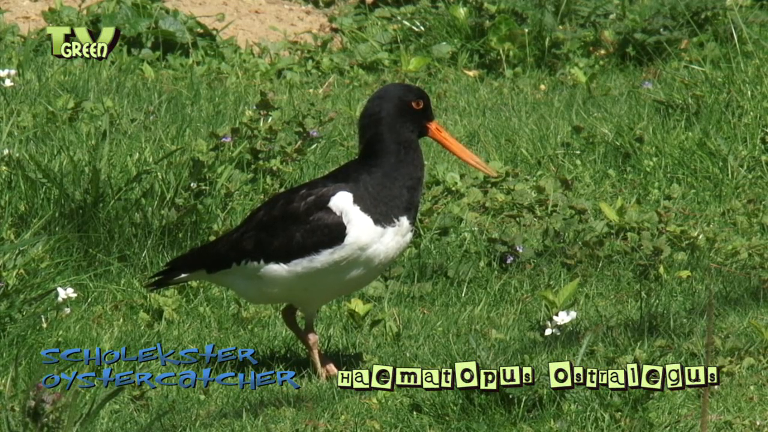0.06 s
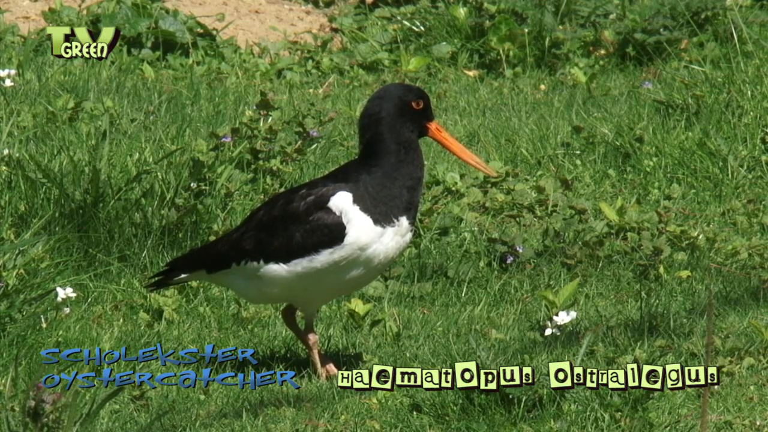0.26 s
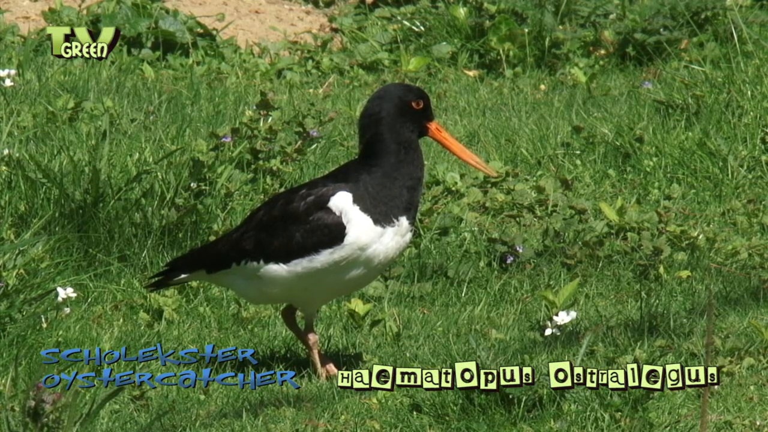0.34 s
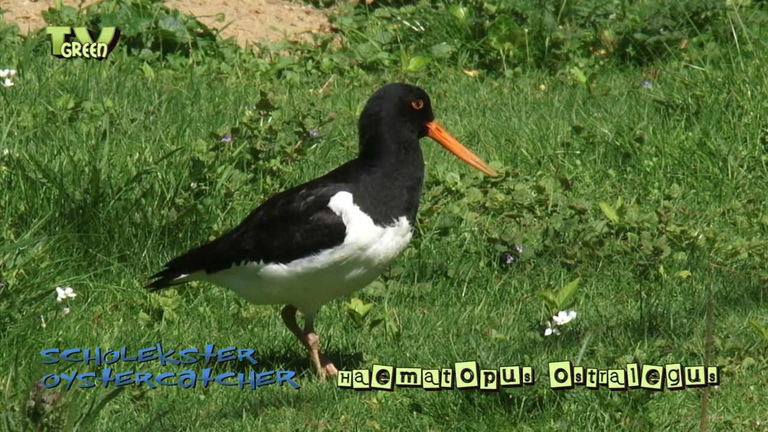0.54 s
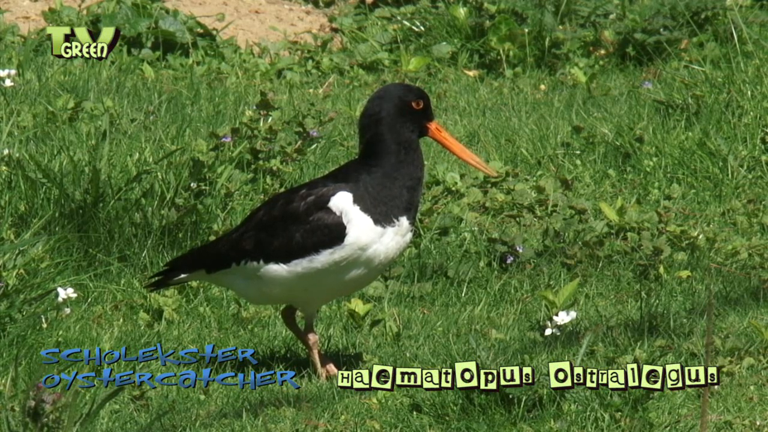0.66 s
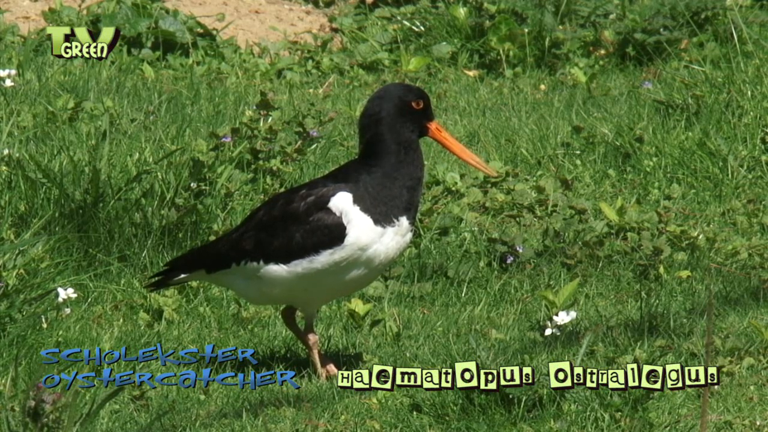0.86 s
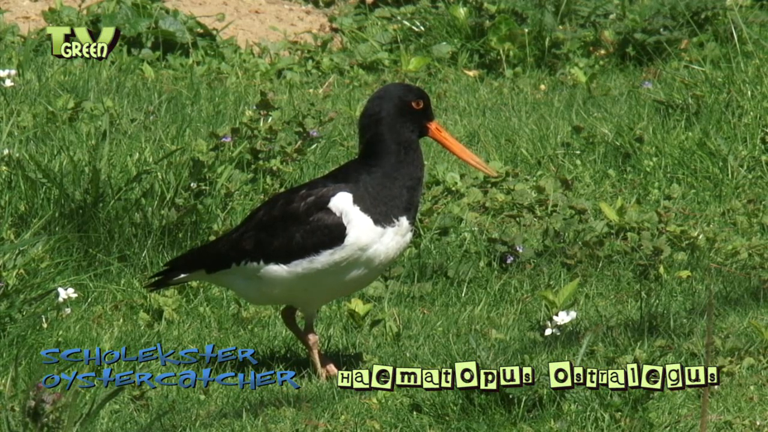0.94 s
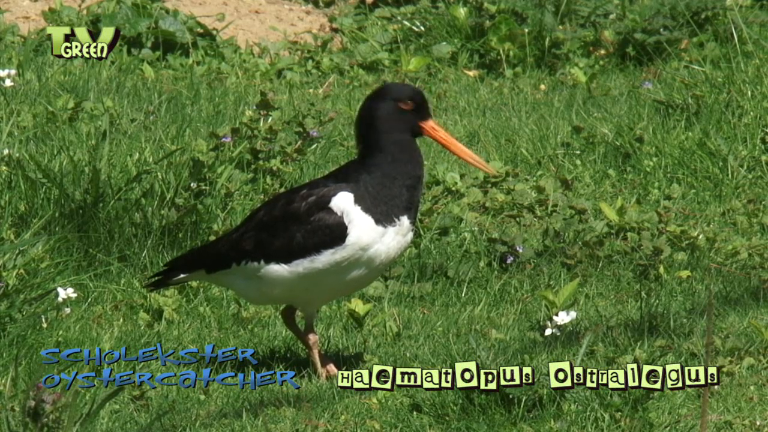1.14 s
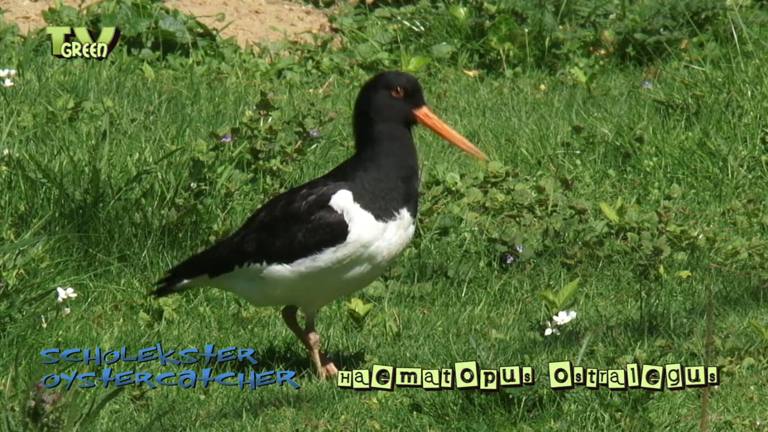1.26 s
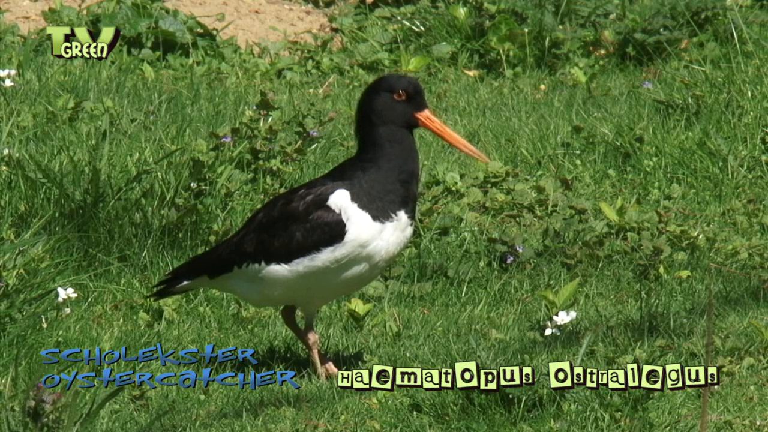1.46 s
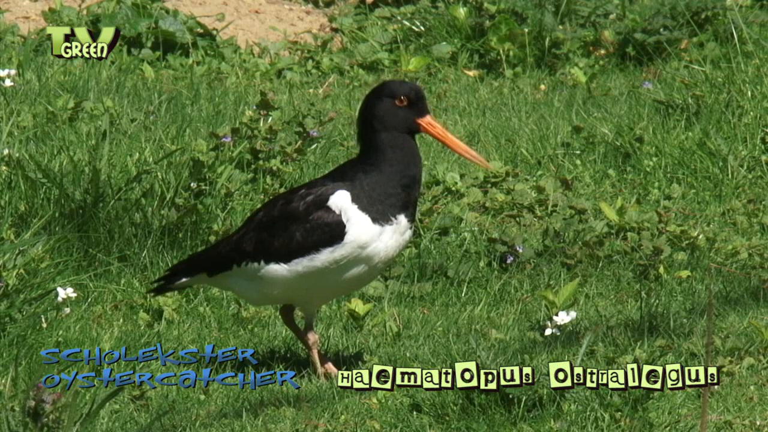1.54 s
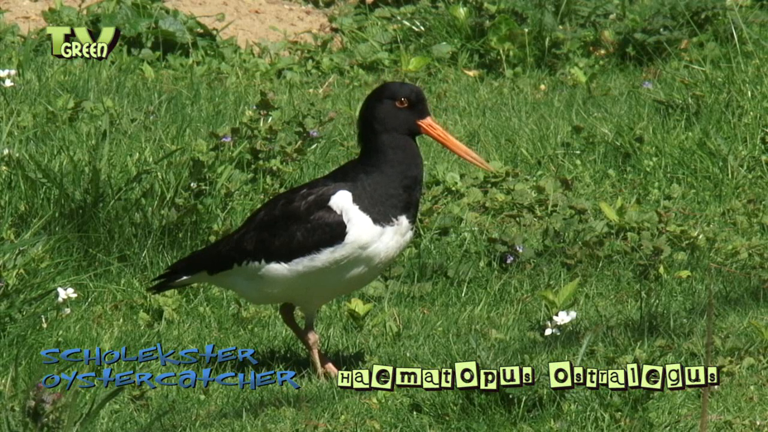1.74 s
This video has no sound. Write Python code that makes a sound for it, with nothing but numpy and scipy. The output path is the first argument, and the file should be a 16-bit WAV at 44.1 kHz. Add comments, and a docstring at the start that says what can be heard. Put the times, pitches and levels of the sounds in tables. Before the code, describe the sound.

An oystercatcher pipes close by, slightly left: a loud, clear, high note at 0.3 seconds and a somewhat softer one at 0.6, each leaping up, holding and dropping after a soft short note. Farther off, birds yelp with hoarse breaks until 1.6 seconds, and a thin whistle repeats four times among faint squeaks. A tiny crackle comes at 0.8 seconds. A quiet, low outdoor wash continues underneath.

```python
"""An oystercatcher on a lawn pipes two loud, clear notes up close, each after a soft short one.
Its voice is a near-pure tone that leaps up, holds and drops, brightening with effort.
Farther off, other birds yelp in arched, overtone-rich calls with hoarse breaks, one repeats a thin
two-part whistle, and faint squeaks slide by, all with a light echo over a steady low outdoor wash.
There is also a brief, faint crackle of tiny clicks, like clipping."""
import sys
import numpy as np
from scipy import signal
from scipy.fft import rfft, irfft
from scipy.io import wavfile
from scipy.ndimage import uniform_filter1d

SR = 44100
rng = np.random.default_rng(int(sys.argv[2]) if len(sys.argv) > 2 else 0)


def unload_audio(sound):
    """Save the sound as a 16-bit wav file, at the path given as the first command line argument."""
    columns = np.transpose(np.atleast_2d(sound))
    # keep every value between -1 and 1, then stretch to whole-number steps
    steps = np.round(np.clip(columns, -1, 1) * 32767)
    wavfile.write(sys.argv[1], SR, steps.astype(np.int16))


N = 79380
T = np.arange(N) / SR
BIN_HZ = np.fft.rfftfreq(N, 1 / SR)


def amp(db):
    """Decibels to gain."""
    return 10 ** (np.asarray(db) / 20)


def unit(x):
    """Scales to rms 1."""
    return x / np.sqrt(np.mean(x ** 2) + 1e-20)


def eq_db(curve, hz):
    """Level of an EQ curve at hz, on a log-frequency axis."""
    points_hz, db = np.transpose(curve)
    return np.interp(np.log(hz + 1), np.log(points_hz + 1), db)


def noise(curve):
    """Noise coloured by an EQ curve, at rms 1."""
    return unit(irfft(rfft(rng.standard_normal(N)) * amp(eq_db(curve, BIN_HZ)), N))


def wobble(hz):
    """Random modulation that rolls off above hz."""
    return unit(irfft(rfft(rng.standard_normal(N)) / (1 + (BIN_HZ / hz) ** 2), N))


def gate(start, end, ramp_s):
    """Opens and closes with short ramps."""
    return np.clip(np.minimum(T - start, end - T) / ramp_s, 0, 1)


def glide(rows, smooth_samples):
    """Smooth pitch and level curves through a call's breakpoints."""
    times, *columns = np.transpose(rows)
    return [uniform_filter1d(np.interp(T, times, column), smooth_samples) for column in columns]


def phase_of(hz, jitter):
    """Running phase of an unsteady voice; jitter is a fraction of the pitch."""
    return 2 * np.pi * np.cumsum(hz * (1 + jitter * wobble(180))) / SR


def pan(x, left_db, left_lag_s=0):
    """Stereo position from the left channel's level and delay against the right."""
    spectrum = rfft(x)
    delay = np.exp(-2j * np.pi * BIN_HZ * left_lag_s)
    return irfft(np.array([spectrum * delay * amp(left_db / 2), spectrum * amp(-left_db / 2)]), N)


# Colour of the outdoor bed. Each row: frequency in Hz, relative level in dB.
BACKGROUND_EQ = [(21, -34), (35, -6), (88, -3.5), (179, -10.5), (243, -14.5), (384, -6.5), (657, -9.5),
                 (727, -3), (847, -5), (938, -5.5), (1090, -7.5), (1210, -6), (1410, -7.5), (1730, -8.5),
                 (2070, -5), (2670, -2.5), (3110, -6.5), (3440, -3), (3720, -6.5), (7210, -37.5),
                 (15500, -35.5)]


def background(level_db=-54, side_db=-20.5):
    """Steady outdoor wash, nearly the same on both sides."""
    middle = pan(noise(BACKGROUND_EQ), left_db=-1.1)
    sides = amp(side_db) * noise(BACKGROUND_EQ) * np.array([[1], [-1]])
    return amp(level_db) * (middle + sides)


# Distant yelps, one list of breakpoints per call. Each row: time in seconds, pitch in Hz,
# second harmonic level in dB, third harmonic level in dB.
YELP_CALLS = [
    [(0.0, 1358, -26.5, -64), (0.008, 1445, -32.5, -52), (0.018, 1430, -40, -51), (0.031, 1396, -29, -46),
     (0.044, 1170, -60.5, -69)],
    [(0.206, 1290.0, -49, -66.5), (0.225, 1325.0, -43.5, -43.5), (0.25, 1275.0, -29, -43),
     (0.28, 1195.0, -40.5, -57.5), (0.32, 1153, -35, -56.5), (0.38, 1150, -35.5, -53.5),
     (0.44, 1127, -36, -61.0), (0.468, 1110, -38, -48.5), (0.487, 981, -45.5, -44.0),
     (0.505, 955.0, -38.5, -38.5), (0.516, 930.0, -65.5, -51.5)],
    [(0.563, 1040.0, -48.5, -51), (0.577, 1193, -34.0, -40), (0.592, 1275, -29.5, -45.5),
     (0.607, 1240, -33.5, -48.5), (0.617, 1078, -51, -39), (0.626, 974, -43, -64)],
    [(0.66, 1128, -47.5, -43.5), (0.68, 1274, -31, -40.5), (0.695, 1336, -25, -42.5),
     (0.72, 1260.0, -36.5, -58.5), (0.745, 1202, -34, -59), (0.772, 1252, -37.5, -54.5),
     (0.786, 1346, -34.5, -46.5), (0.796, 1412, -23.5, -54.5), (0.808, 1429, -23.0, -44.5),
     (0.821, 1419, -25.5, -47.5), (0.83, 1302, -34, -40.5), (0.838, 1200.0, -51, -77)],
    [(1.001, 1305.0, -49, -64), (1.008, 1315, -33, -42.5), (1.023, 1333.0, -28, -45.5),
     (1.038, 1316, -33.5, -41.0), (1.047, 1284, -40, -58.5), (1.066, 1240.0, -29.5, -55.5),
     (1.1, 1155, -41.5, -69), (1.15, 1130.0, -52.5, -58.0), (1.195, 1105, -37.5, -69),
     (1.228, 1072, -48, -41.5), (1.252, 1064, -47.5, -45), (1.278, 999, -41, -41.5),
     (1.3, 876, -66.5, -51.5)],
    [(1.355, 1034, -47, -58.5), (1.364, 1175, -35.5, -42), (1.373, 1245.0, -31.5, -48.5),
     (1.383, 1253, -34.5, -48), (1.394, 1254, -33.5, -47), (1.405, 1084, -45.0, -43.5),
     (1.415, 1010, -71, -72.0)],
    [(1.448, 1080.0, -63, -59.5), (1.455, 1180, -37.5, -44), (1.465, 1271, -33.5, -36.5),
     (1.476, 1344, -44, -44), (1.487, 1321, -29.5, -32), (1.506, 1350, -27.0, -40), (1.519, 1373, -25, -44),
     (1.538, 1384, -23, -40.5), (1.55, 1340, -32.5, -36.5), (1.558, 1235, -42.0, -46),
     (1.566, 1120, -60.5, -74.5)],
]
# Throat colour for harmonics 1 and 4 to 6. Each row: frequency in Hz, relative level in dB.
THROAT_EQ = [(950,-20),(1200,-15.5),(1350,-24),(1430,-15),(2500,-6.5),(3800,-7),(4400,-12.5),(4750,-22),(5300,-21.5),(5700,-27.5),(6300,-44),(8000,-52)]


def yelp(rows, waver_db=4, rasp_db=-24):
    """An arched call: weak fundamental, strong second and third harmonics, wavering upper ones."""
    hz, second_db, third_db = glide(rows, smooth_samples=130)
    phase = phase_of(hz, jitter=0.0042)
    levels = [second_db + eq_db(THROAT_EQ, hz), second_db, third_db + waver_db / 2 * wobble(45)]
    body_db = (second_db + third_db) / 2
    levels += [body_db + eq_db(THROAT_EQ, k * hz) + waver_db * wobble(30) for k in range(4, 7)]
    tone = sum(amp(db) * np.sin(k * phase) for k, db in enumerate(levels, 1))
    rasp = 1 + amp(rasp_db) * wobble(420)
    return np.sqrt(2) * tone * rasp * gate(rows[0][0], rows[-1][0], ramp_s=0.001)


# Faint far calls and quick squeaks. Each row: start in seconds, length in seconds,
# opening pitch in Hz, closing pitch in Hz, level in dB.
FAINT_CALLS = [(0.038,0.066,3330,3580,-64.5),(.11,0.14,4000,4830,-69),(0.137,0.031,3080,2810,-54),(0.274,0.015,4700,3560,-53.5),(.55,0.032,2100,2195,-42.5),(0.931,0.056,2420,2340,-57.5),(0.948,.05,3155,3400,-61),(1.014,0.029,2050,3870,-51.5),(1.309,0.034,1970,2022,-51.5),(1.346,0.023,2900,2990,-46.5),(1.467,0.013,2500,3850,-47),(1.722,0.075,2316,2180,-62.5)]


def faint_call(start, length, from_hz, to_hz, db):
    """A far bird's thin slide of pitch."""
    hz = np.interp(T, [start, start + length], [from_hz, to_hz])
    envelope = amp(db) * gate(start, start + length, ramp_s=0.004)
    return np.sqrt(2) * envelope * np.sin(phase_of(hz, jitter=0.011))


# Two-part whistles. Each row: start of the long note in seconds, its length in seconds, its level in dB,
# lead-in level in dB, time from that start to the lift in seconds, lift height in Hz.
WHISTLE_CALLS = [(0.183,.2,-43,-47,0.13,71.6),(0.649,0.2,-39,-41,0.13,67),(1.083,0.203,-37.5,-42,.168,96.3),(1.519,0.19,-44,-44,.11,40)]


def whistle(start, length, db, lead_db, lift_at, lift_hz):
    """A short low lead-in breaks upward, then settles on a long note that lifts once."""
    lead_hz, settled_hz, overshoot_hz = 2165, 2229, 240
    lead_s, attack_s, settle_s, lift_s, release_s = 0.032, 0.001, 0.01587, 0.032, 0.024
    age = np.maximum(T - start, 0)
    overshoot = overshoot_hz * np.exp(-age / settle_s)
    lift = lift_hz * np.exp(-((age - lift_at) / lift_s) ** 2)
    hz = np.where(T < start, lead_hz, settled_hz + overshoot + lift)
    held = np.clip(np.minimum(age / attack_s, (length - age) / release_s), 0, 1)
    envelope = amp(db) * held + amp(lead_db) * gate(start - lead_s, start, ramp_s=0.0017)
    return np.sqrt(2) * envelope * np.sin(phase_of(hz, jitter=0.0038))


# The oystercatcher's notes (soft, loud, soft, loud), one list of breakpoints each.
# Each row: time in seconds, pitch in Hz, level in dB.
PIPE_NOTES = [
    [(0.193, 1878, -56.5), (0.201, 1990.0, -36), (0.212, 2048, -30), (0.225, 1970.0, -39.5),
     (0.24, 1750, -35.5), (0.252, 1520, -63)],
    [(0.306, 2068, -26.5), (0.311, 2207, -23), (0.319, 2375, -22), (0.323, 2872, -13.5),
     (0.329, 2900, -14.5), (0.341, 3020, -18.5), (0.38, 3038, -17.0), (0.398, 3015, -18),
     (0.42, 2944, -17.0), (0.452, 2903, -16.5), (0.467, 2800.0, -19.0), (0.474, 2590, -28.5),
     (0.479, 2040, -30), (0.489, 1830, -36.5)],
    [(0.516, 1993, -45.5), (0.527, 2040, -38.5), (0.54, 1995, -42.5), (0.55, 1740, -53)],
    [(0.626, 2047, -41), (0.638, 2464, -33.5), (0.644, 2920, -28.5), (0.66, 3212, -26.0),
     (0.688, 3244, -23), (0.718, 3204, -26), (0.733, 3054, -39), (0.743, 2930, -27), (0.75, 2083, -44),
     (0.76, 1740, -57)],
]
# Its overtones at full brightness. Each row: frequency in Hz, level against the fundamental in dB.
BEAK_EQ = [(3500,-13),(4200,-1),(4900,-0.5),(5600,-15),(6100,-8.5),(6500,-12),(7500,-30),(8650,-43.5),(9080,-23.5),(9800,-34),(12000,-70),(15000,-62)]


def pipe(rows, jitter=0.0024, full_effort_db=-17, bright_hz=3080, rasp_db=-35.5, trim_db=0.04):
    """One near-pure piped note; effort brings out the top overtones and a faint, shrill second tone."""
    hz, db = glide(rows, smooth_samples=100)
    phase = phase_of(hz, jitter)
    octave, *upper = [amp(eq_db(BEAK_EQ, k * hz)) * np.sin(k * phase) for k in range(2, 6)]
    shrill_hz = 7160 * (hz / bright_hz) ** 0.79  # partly follows the pitch
    shrill_phase = phase_of(shrill_hz, jitter)
    sum_tones = np.sin(shrill_phase + phase) + np.sin(shrill_phase + 2 * phase)
    shrill = amp(-34.5) * (np.sin(shrill_phase) + amp(-20.5) * sum_tones)
    half_harmonics = amp(-61.5) * sum(np.sin((k + 0.5) * phase) for k in range(2, 5))
    top = sum(upper) + shrill + half_harmonics
    # The top fades dB for dB as the note softens, and 20.5 dB per octave as it drops.
    top_db = np.minimum(db - full_effort_db, 0) + 20.5 * np.minimum(np.log2(hz / bright_hz), 0)
    tone = np.sin(phase) + octave + amp(top_db) * top
    rasp = 1 + amp(rasp_db) * wobble(900)
    envelope = amp(db + trim_db) * gate(rows[0][0], rows[-1][0], ramp_s=0.0041)
    return np.sqrt(2) * envelope * tone * rasp


# The oystercatcher's stereo balance. Each row: frequency in Hz, left minus right in dB.
PIPE_BALANCE = [(2000,5.5),(3000,5),(3260,-0.5),(4400,4.5),(6000,-3),(6500,-5),(9000,-4.5),(13000,-8.5)]


def oystercatcher(echo_db=-33.5):
    """The close bird's piping, a little to the left, with a faint wide echo."""
    notes = sum(pipe(rows) for rows in PIPE_NOTES)
    direct = pan(notes, eq_db(PIPE_BALANCE, BIN_HZ), left_lag_s=0.000078)
    return direct + amp(echo_db) * np.array([echo(notes), echo(notes)])


# Hoarse breaks in the yelps. Each row: start in seconds, length in seconds, level in dB.
HOARSE_BREAKS = [(0.468,0.084,-46),(.56,.02,-44.5),(0.628,0.019,-55.5),(1.275,0.11,-51)]
# Colour of the hoarseness. Each row: frequency in Hz, relative level in dB.
HOARSE_EQ = [(900,-37.5),(1700,-3.5),(2200,-6),(2900,-1.5),(3800,-9),(5000,-31),(7000,-56.5),(16000,-71.5)]


def hoarseness():
    """Bursts of noise where the distant voices break."""
    bursts = sum(amp(db) * gate(start, start + length, 0.003) for start, length, db in HOARSE_BREAKS)
    return noise(HOARSE_EQ) * bursts


def crackle(start=0.8, length=0.017, clicks_per_s=600, db=-41):
    """A brief, faint crackle of tiny clicks, like clipping."""
    cycles = phase_of(clicks_per_s, jitter=0.2) / (2 * np.pi)
    clicks = np.diff(np.floor(cycles), prepend=0)
    return amp(db) * clicks * rng.uniform(0.3, 1, N) * gate(start, start + length, ramp_s=0.001)


def echo(x, t60_s=0.39, predelay_s=0.004):
    """Scatter from the plants and ground around."""
    tail = rng.standard_normal(N) * amp(-60 * T / t60_s) * (T > predelay_s)
    return signal.fftconvolve(x, tail / np.linalg.norm(tail))[:N]


def scene():
    """The oystercatcher up close, far birds and a crackle just right of centre, the bed underneath."""
    near = oystercatcher()
    far = sum(yelp(rows) for rows in YELP_CALLS)
    far += sum(whistle(*row) for row in WHISTLE_CALLS)
    far += sum(faint_call(*row) for row in FAINT_CALLS)
    far += hoarseness()
    backing = far + crackle()
    backing += amp(-28.5) * echo(backing)
    return near + pan(backing, left_db=-1.82) + background()


def record(dry, cutoff_hz=15720):
    """A steep low-pass trims the very top of the mix."""
    lowpass = signal.firwin(511, cutoff_hz, window=("kaiser", 9), fs=SR)
    return signal.oaconvolve(dry, lowpass[None], "same")


dry = scene()
out = record(dry)
unload_audio(out)
```